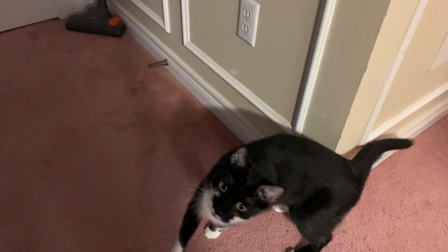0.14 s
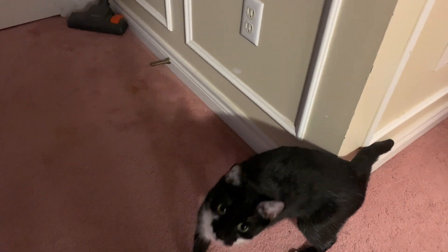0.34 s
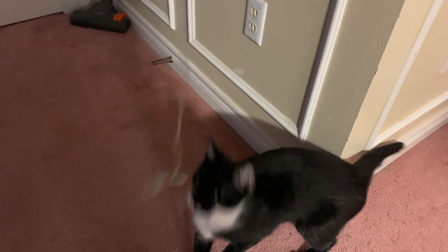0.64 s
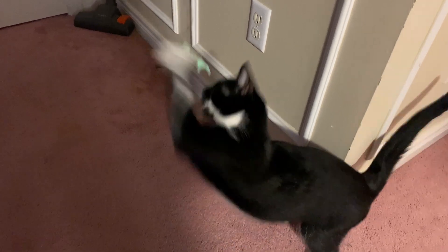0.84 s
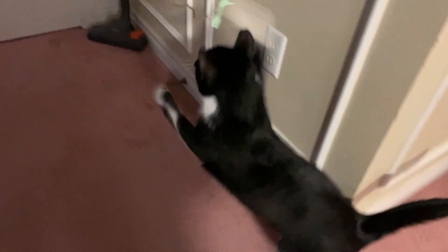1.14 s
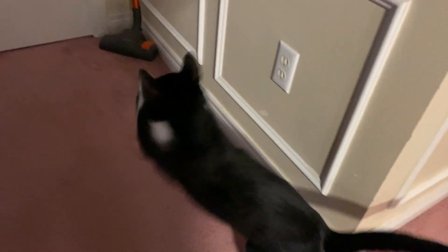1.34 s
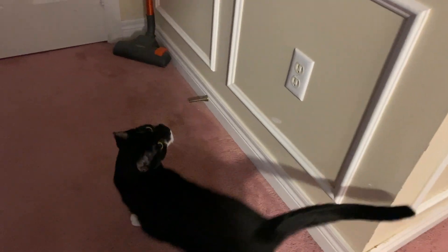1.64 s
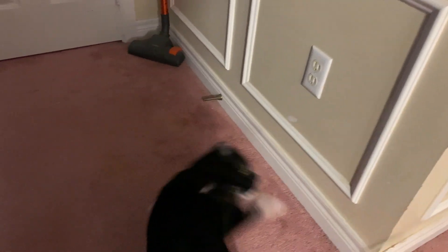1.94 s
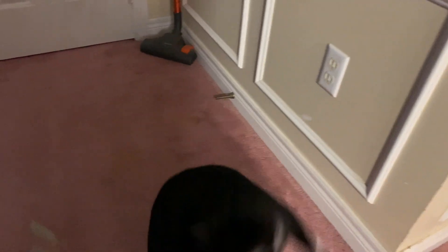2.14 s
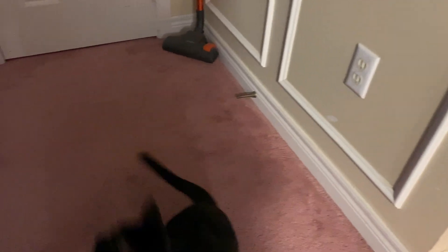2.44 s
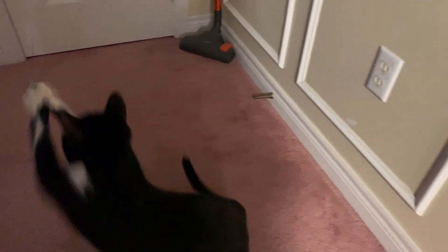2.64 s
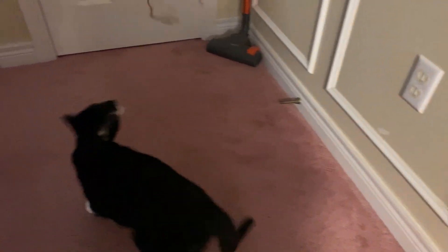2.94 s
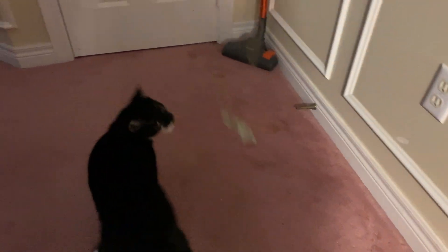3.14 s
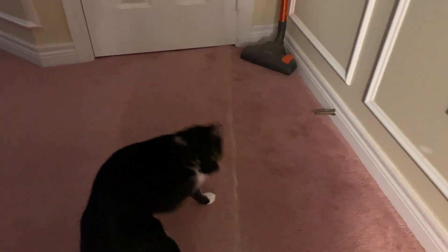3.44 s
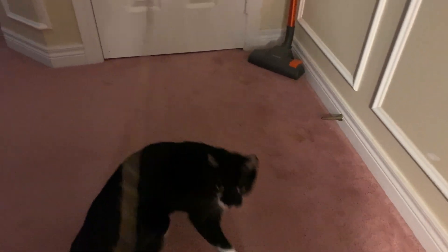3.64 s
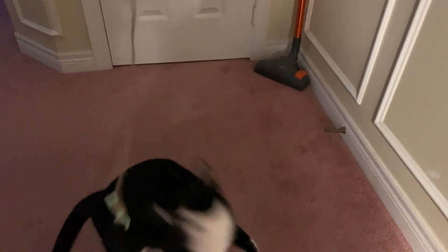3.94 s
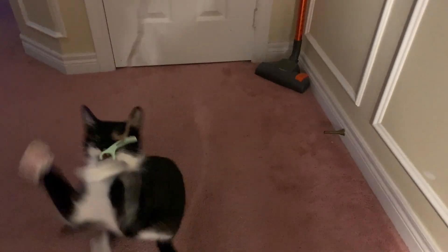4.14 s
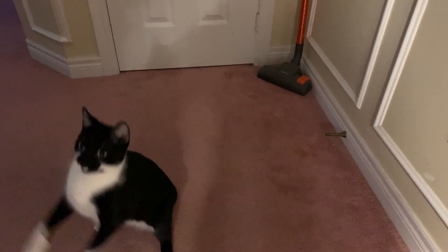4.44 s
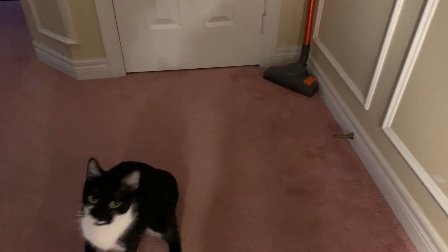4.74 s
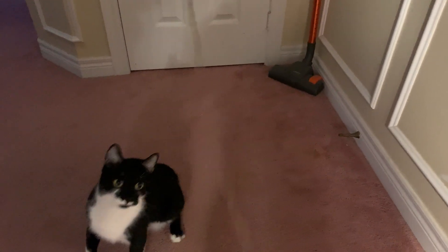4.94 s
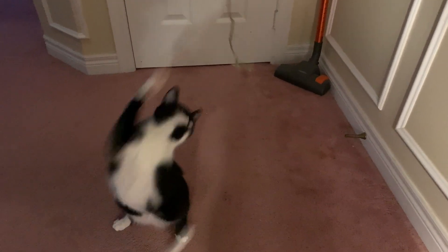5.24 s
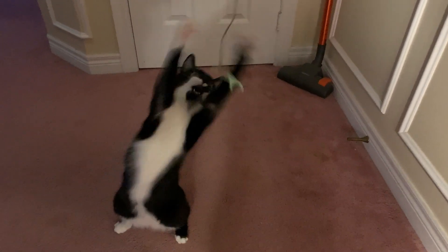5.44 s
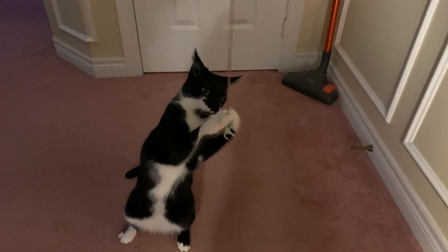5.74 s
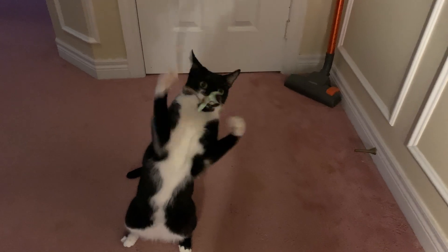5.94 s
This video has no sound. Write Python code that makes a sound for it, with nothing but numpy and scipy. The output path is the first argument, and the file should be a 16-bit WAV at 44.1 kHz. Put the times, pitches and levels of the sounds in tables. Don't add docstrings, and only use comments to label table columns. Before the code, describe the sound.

In a small carpeted hall, a cat plays with a string toy close to a hand-held stereo camera. Dry bright ticks come singly or in tight clusters, the hardest with a panel knock about a quarter of the way in. Muffled low paw thumps follow, with faint fur brushes, then more ticks and landings. Low ventilation hum and soft hiss run throughout, and short hall echoes follow each click.

```python
import sys
import numpy as np
from scipy import signal
from scipy.fft import rfft, irfft, next_fast_len
from scipy.io import wavfile
from scipy.ndimage import uniform_filter1d

SR = 44100
rng = np.random.default_rng(int(sys.argv[2]) if len(sys.argv) > 2 else 0)


def persist_wave(psi):
    counts = np.round(np.clip(psi, -1, 1) * 32767).astype(np.int16)
    wavfile.write(sys.argv[1], SR, np.atleast_2d(counts).T)


def field_ratio(decibels):
    return 10 ** (np.asarray(decibels, dtype=float) / 20)


N = 269010


def read(points, hz):
    f, value = np.transpose(points)
    return np.interp(np.log(hz + 1), np.log(f + 1), value)


def add(mix, time_s, sound):
    at = max(round(time_s * SR), 0)
    part = mix[..., at:at + sound.shape[-1]]
    part += sound[..., :part.shape[-1]]


def band(x, lo_hz, hi_hz, order=2):
    return signal.sosfilt(signal.butter(order, [lo_hz, hi_hz], "band", fs=SR, output="sos"), x)


def ventilation():
    # (frequency [Hz], density [dB per Hz])
    air_spectrum = [(20, -102), (33, -90.5), (47, -75.5), (80, -81.5), (200, -77.5), (400, -87),
                    (560, -96.5), (900, -101), (2500, -110.5), (4000, -114), (7400, -118), (8000, -115),
                    (10600, -116), (15400, -121), (16000, -135)]
    # (frequency [Hz], width [Hz], density [dB per Hz])
    hall_modes = [(57, 27, -75.5), (113, 20.7, -74), (150.2, 6.7, -84.5), (196.6, 12, -75),
                  (224.3, 7.6, -63.5), (269.6, 13, -78), (298.7, 11.8, -75), (360.6, 6.8, -79),
                  (412.6, 7.6, -73)]
    # (time [s], hiss [dB], rumble [dB], hum [dB])
    swell_curve = [(0.0, -72, -57.5, -57.5), (0.2, -74.5, -62.5, -56), (0.49, -74, -60, -56),
                   (0.8, -76, -62, -57), (0.97, -78, -59, -56), (1.17, -75, -57, -53),
                   (1.32, -67.5, -53, -55), (1.51, -75.5, -63.5, -55.5), (1.66, -71.5, -52, -56),
                   (1.83, -74, -58, -56.5), (2.07, -71, -59, -57), (2.26, -73, -63.5, -55.5),
                   (2.46, -71.5, -56, -56.5), (2.75, -72, -57, -51), (2.9, -71, -58, -54),
                   (3.16, -75.5, -60, -58), (3.28, -74, -57.5, -63.5), (3.48, -72, -63, -57.5),
                   (3.67, -71.5, -59, -55), (3.8, -68, -53, -53), (4.04, -71.5, -58, -56.5),
                   (4.21, -71.5, -58, -53), (4.5, -74, -60.5, -58), (4.77, -73.5, -61.5, -57),
                   (5.08, -72.5, -58.5, -59.5), (5.35, -73.5, -59, -55.5), (5.56, -71.5, -61, -55),
                   (5.72, -72.5, -56.5, -59), (5.86, -69, -67, -55.5), (6.0, -66, -59.5, -56),
                   (6.1, -66.5, -61, -52)]
    # (frequency [Hz], likeness [0-1])
    likeness = [(60, 0.85), (250, 0.94), (450, 0.8), (750, 0), (1500, 0), (6000, 0.031)]
    size, hop = 8192, 2048
    frames, hz = N // hop + 6, np.fft.rfftfreq(size, 1 / SR)
    a, b, c, d = rng.standard_normal((frames, len(hz), 4)).T
    left, other = a + 1j * b, c + 1j * d
    same = np.clip(read(likeness, hz), 0, 1)[:, None]
    z = np.array([left, same * left + np.sqrt(1 - same ** 2) * other])

    power = field_ratio(read(air_spectrum, hz)) ** 2
    for mode_hz, width_hz, db in hall_modes:
        power += field_ratio(db) ** 2 / (1 + (2 * (hz - mode_hz) / width_hz) ** 2) ** 2

    time_s, *swells = np.transpose(swell_curve)
    frame_s = np.arange(frames) * hop / SR
    hiss_db, rumble_db, hum_db = (np.interp(frame_s, time_s, db - np.median(db)) for db in swells)
    above_rumble_db = np.where(hz[:, None] < 340, hum_db, hiss_db)
    swell_db = np.where(hz[:, None] < 160, rumble_db, above_rumble_db)
    share = 0.86 / (1 + (hz / 2500) ** 2)
    z *= np.sqrt(power)[:, None] * field_ratio(share[:, None] * swell_db)
    return field_ratio(8.5) * signal.istft(z, nperseg=size, noverlap=size - hop)[1][:, :N]


def mottle(x, depth_db=2.5):
    hz, t, z = signal.stft(x, SR, nperseg=512)
    patches = uniform_filter1d(rng.standard_normal((len(t), len(hz))), size=5, axis=0)
    patches = uniform_filter1d(patches, size=3, axis=1).T
    reach = (hz > 150) / (1 + (hz / 3500) ** 2)
    gain = field_ratio(depth_db * reach[:, None] * patches / patches.std())
    return signal.istft(z * gain, SR, nperseg=512)[1][:, :N]


def brushes():
    # (middle time [s], level [dB rms], length [s], brightness [dB per octave])
    strokes = [(.07, -79.5, .03, -4), (.1, -81, 0.07, -8), (1.117, -73, 0.024, -11),
               (1.23, -67, 0.047, -7.5), (1.283, -62.5, 0.028, -1), (1.49, -67.5, 0.023, -3),
               (2.311, -67, 0.032, -8), (2.317, -71, 0.026, 2.5), (2.358, -63, 0.024, 0),
               (2.662, -58.5, 0.015, 2), (3.718, -72.5, .09, -9.5), (3.883, -72, 0.032, -2),
               (4.082, -77, .04, -3), (4.166, -57.5, .035, -4), (4.227, -72.5, 0.11, -9),
               (5.347, -78, 0.032, -5), (5.503, -68, 0.072, -6.5), (5.559, -67.5, 0.067, 0.5),
               (5.81, -68, 0.022, -1), (6.032, -74.5, 0.037, 0)]
    out = np.zeros((2, N))
    t = np.arange(-.15, .15, 1 / SR)
    hz = np.fft.rfftfreq(len(t), 1 / SR)
    for time_s, db, length_s, tilt_db in strokes:
        grains = rng.standard_normal((2, len(t))) * field_ratio(0.79 * rng.exponential(1, len(t)))
        colour = field_ratio(tilt_db * np.log2(hz / 4000 + 0.019)) * hz ** 2 / (hz ** 2 + 400 ** 2)
        stroke = irfft(rfft(grains / grains.std()) * colour, len(t))
        swell = np.exp(-np.log(16) * (t / length_s) ** 2)
        add(out, time_s - .15, field_ratio(db) * stroke * swell)
    return out


def thumps():
    # (time [s], peak level [dB], frequency [Hz], length [s])
    landings = [(0.082, -39.5, 206, 0.0073), (0.098, -42, 106, 0.026), (0.103, -42.5, 215, 0.027),
                (1.263, -37.5, 190, 0.0074), (1.273, -35.5, 103, 0.02), (1.275, -40.5, 55, 0.047),
                (1.505, -40, 192, 0.011), (1.582, -38, 250, 0.011), (1.586, -43, 110, 0.0093),
                (1.61, -34, 236, 0.0038), (1.7, -49, 126, 0.035), (2.312, -30.5, 105, 0.0091),
                (2.315, -35, 210, 0.02), (2.335, -32, 203, 0.0079), (2.339, -38, 60, 0.016),
                (2.344, -22, 101, 0.015), (2.379, -35, 52.7, 0.042), (2.385, -38.6, 96, 0.037),
                (2.393, -40.5, 193, 0.0098), (2.406, -43.7, 86, 0.085), (2.703, -41, 90, 0.0061),
                (2.715, -45, 60, 0.042), (2.726, -30, 95, 0.027), (2.73, -34, 198, 0.0079),
                (2.765, -34, 94.6, 0.016), (2.766, -39.5, 63, 0.034), (2.874, -38, 243, 0.011),
                (2.877, -37.5, 89.5, 0.019), (2.898, -39.5, 199, 0.012), (2.908, -33, 116, 0.008),
                (2.913, -33.5, 57, 0.045), (2.924, -40.5, 210, 0.013), (2.934, -44.5, 87, 0.045),
                (2.976, -37.5, 60.5, 0.058), (2.985, -38.5, 104, 0.0082), (4.172, -33, 215, 0.0082),
                (4.177, -38.5, 88, 0.038), (4.183, -33, 57, 0.038), (4.219, -44, 92, 0.0092),
                (4.233, -42.5, 214, 0.036), (4.247, -35.5, 57, 0.039), (4.255, -45, 76, 0.029),
                (4.983, -45, 230, 0.017)]
    # (time [s], peak level [dB], frequency [Hz], length [s])
    light_steps = [(0.131, -39.5, 84, .025), (0.786, -48.5, 110, .02), (0.986, -48, 60, .03),
                   (1.5, -46, 56, .04), (1.75, -44, 45.3, .05), (1.883, -51, 55, .04),
                   (2.414, -37, 38, 0.055), (2.543, -46.5, 47.5, 0.033), (3.046, -47, 60, 0.022),
                   (3.129, -45.5, 64, 0.049), (3.658, -49, 109, 0.011), (3.799, -47, 55.3, 0.062),
                   (3.967, -45.5, 110, 0.019), (4.358, -44.5, 60, 0.049), (5.38, -51.5, 57, 0.055),
                   (0.081, -59, 594, 0.0046), (2.306, -51, 400, 0.011), (2.874, -52.5, 350, 0.01),
                   (4.16, -45, 400, 0.009), (1.221, -57, 705, 0.0078), (6.047, -55.5, 706, 0.0058)]
    out = np.zeros((2, N))
    for time_s, db, hz, length_s in landings + light_steps:
        t = np.arange(-2 * length_s, 2 * length_s, 1 / SR)
        swell = np.exp(-np.log(16) * (t / length_s) ** 2)
        phase_cycles = rng.random() + rng.normal(0, 0.027, (2, 1))
        push = np.sin(2 * np.pi * (hz * t + phase_cycles))
        add(out, time_s - 2 * length_s, field_ratio(db) * swell * push)
    return out * field_ratio(np.array([[-.4], [.4]]))


def knock():
    # (time [s], colour as (frequency [Hz], level [dB]))
    blows = [
        (.9838, [(300, -27.5), (750, -9), (1200, -16.5), (1900, -14), (2600, -20), (3300, -18), (4500, -19), (6500, -25.5), (10000, -28), (15000, -30)]),
        (1.5590, [(250, -8.5), (680, 0.5), (1400, 4.5), (2100, 1.5), (3200, 9), (4300, -6.5), (6000, -7), (7800, -5), (9500, -21), (11600, 6), (13000, -7), (16000, -15)]),
    ]
    out, hz = np.zeros((2, N)), np.fft.fftfreq(4096, 1 / SR)
    for time_s, colour in blows:
        log_gain = np.log(field_ratio(read([(40, -32)] + colour, abs(hz))))
        panel = np.fft.ifft(np.exp(np.conj(signal.hilbert(log_gain)))).real[:2048]
        blow = 0.14 * rng.standard_normal((2, 200)) * np.exp(-np.arange(200) / 30.)
        blow[[0, 1], [8, 3]] += 1
        add(out, time_s, signal.fftconvolve(blow, panel[None], axes=1))
    return out


def ticks():
    # (time [s], ring level [dB], ring frequency [Hz], ring width [Hz], snap level [dB],
    #  sparkle level above 8 kHz [dB])
    contacts = [(0.7963, -20.5, 5430, 300, -37, -37), (0.7958, -25.5, 7500, 1500, -50, -50),
                (.991, -20, 4700, 900, -33, -45), (1.1655, -51, 3780, 900, -34.5, -43),
                (1.219, -32.5, 2880, 800, -41, -45), (1.2467, -28, 1690, 700, -31.5, -50),
                (1.2593, -26, 6100, 1500, -42, -25.5), (1.2827, -38, 4960, 1200, -37, -51),
                (1.423, -43, 2500, 1508, -56, -61), (1.5622, -10, 5840, 1480, -18.5, -25),
                (1.565, -15.5, 11400, 1505, -33, -30), (1.5683, -12.5, 11300, 1500, -26, -26),
                (2.636, -12.5, 6940, 1480, -23, -27), (2.641, -17.5, 4650, 900, -34, -40),
                (3.2124, -44, 3000, 1200, -48, -54), (3.9786, -22, 1900, 400, -45.5, -48),
                (4.0064, -26.5, 4900, 700, -42, -31.5), (4.006, -22, 13200, 3960, -34, -47),
                (4.008, -25, 2700, 500, -48, -50), (4.035, -24.5, 3220, 500, -35, -44.5),
                (4.0345, -40, 5970, 1500, -50, -49.5), (4.2112, -23.5, 4140, 920, -58, -47),
                (5.3153, -16.5, 5900, 1240, -23, -49), (5.3186, -23, 2400, 500, -40, -40),
                (5.322, -20.5, 4600, 900, -31, -52), (5.4784, -25.5, 1230, 590, -40, -48),
                (6.0465, -21, 1900, 396, -41, -42.5)]
    out, t = np.zeros((2, N)), np.arange(3000) / SR
    for time_s, ring_db, hz, width_hz, snap_db, sparkle_db in contacts:
        burst = 0.15 * rng.standard_normal((2, len(t))) * np.exp(-t / 0.00091)
        burst[[0, 1], rng.integers(4, 16, 2)] += 1
        ring = field_ratio(ring_db) * band(burst, hz - width_hz / 2, hz + width_hz / 2)
        snap = field_ratio(snap_db) * band(burst, 660, 9600)
        sparkle = field_ratio(sparkle_db) * band(burst, 7200, 16800)
        add(out, time_s - .0004, ring + snap + sparkle)
    return out


def smear(x):
    t = np.arange(1100) / SR
    fade = np.exp(-t / 0.012) * np.cos(np.pi * t / t[-1] / 2)
    spread = band(rng.standard_normal((2, len(t))), 937, 8200) * fade
    spread = spread[:, ::-1] / np.linalg.norm(spread[0])
    return x + field_ratio(-24.5) * signal.fftconvolve(x, spread, axes=1)[:, -N:]


def hall(x):
    # (frequency [Hz], t60 [s])
    decay = [(250, 0.69), (700, 0.32), (1500, 0.29), (3000, 0.21), (5500, .18), (9000, .14), (14000, 0.14)]
    # (frequency [Hz], level [dB])
    echo_colour = [(300, 8), (800, 4.5), (2000, -3.5), (4000, 2.5), (7000, -3), (10000, -9), (15000, -7)]
    taps = np.zeros((2, SR // 2))
    slots = np.arange(120, SR // 2 - 16, 16)
    at = slots + rng.integers(0, 16, (2, len(slots)))
    np.put_along_axis(taps, at, rng.choice([-1., 1.], at.shape), 1)
    hz, t, z = signal.stft(taps, SR, nperseg=128)
    early = 1 + 2.0 * np.exp(-t / 0.004)
    fade = field_ratio(-60 * t / read(decay, hz)[:, None])
    tail = signal.istft(z * early * fade, SR, nperseg=128)[1]
    size = tail.shape[1]
    colour = field_ratio(read(echo_colour, np.fft.rfftfreq(size, 1 / SR)))
    tail = irfft(rfft(tail / np.linalg.norm(tail[0])) * colour, size)
    return signal.fftconvolve(x, tail, axes=1)[:, :N]


def scene():
    sharp = ticks() * field_ratio(np.array([[1.3], [-1.3]])) + knock()
    fur = brushes()
    echoes = hall(field_ratio(-1.5) * sharp + field_ratio(-7) * fur)
    return smear(sharp) + fur + echoes + thumps() + mottle(ventilation())


def band_limit(x):
    return signal.sosfilt(signal.butter(12, 16490, fs=SR, output="sos"), x)


def record(dry):
    shared_hz, lag_samples, edge_hz = 7900, 6.72, 16350
    size = next_fast_len(N + 512)
    hz, (left, right) = np.fft.rfftfreq(size, 1 / SR), rfft(dry, size)
    late = left * np.exp(-2j * np.pi * hz * lag_samples / SR)
    both = np.array([left, np.where(hz > shared_hz, late, right)])
    both *= hz ** 2 / (hz ** 2 + 30 ** 2)
    both /= 1 + (hz / edge_hz) ** 80
    return band_limit(irfft(both, size)[:, :N])


dry = scene()
out = record(dry)
persist_wave(out)
```